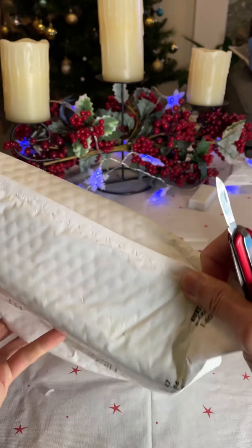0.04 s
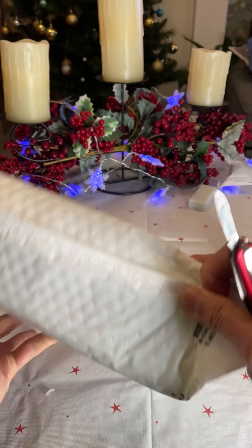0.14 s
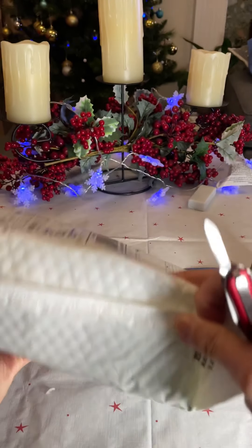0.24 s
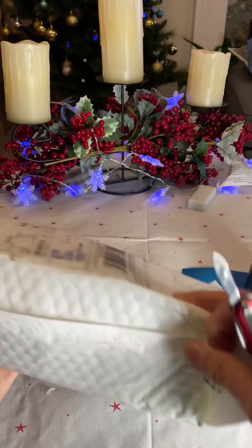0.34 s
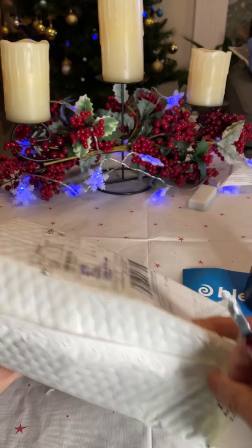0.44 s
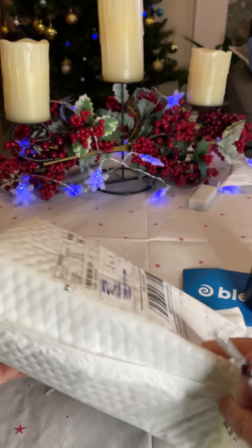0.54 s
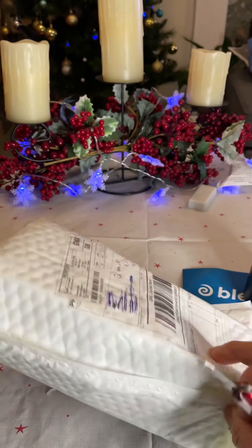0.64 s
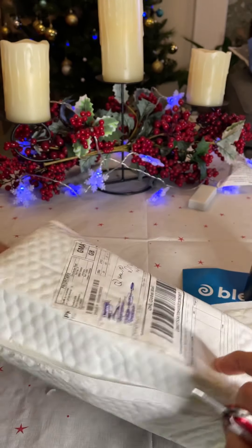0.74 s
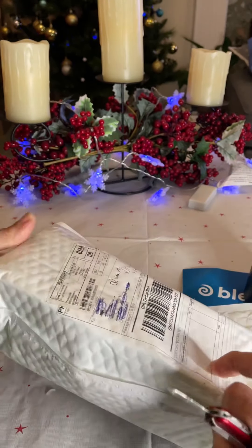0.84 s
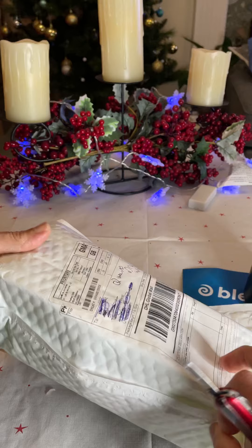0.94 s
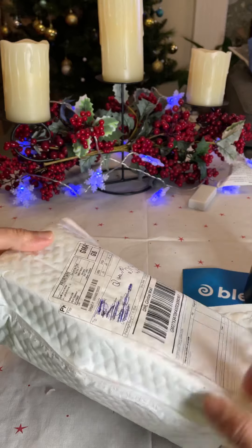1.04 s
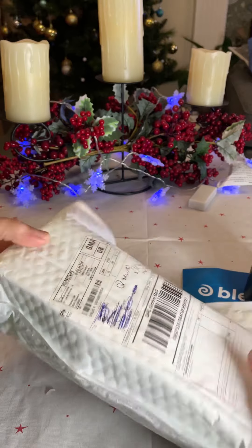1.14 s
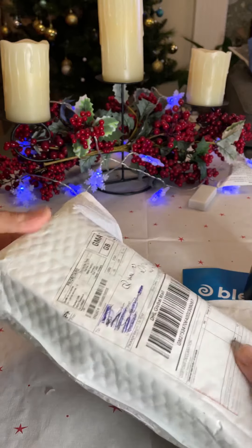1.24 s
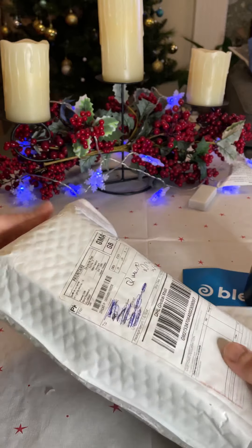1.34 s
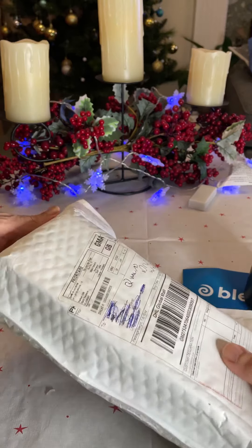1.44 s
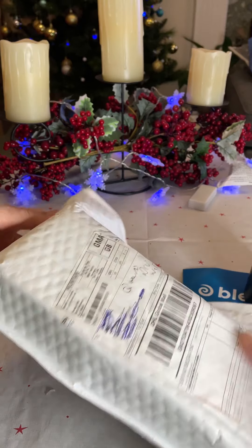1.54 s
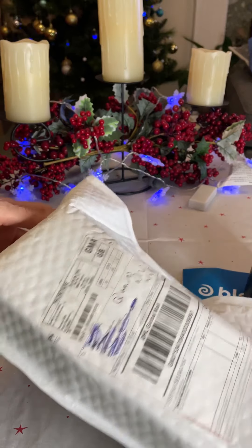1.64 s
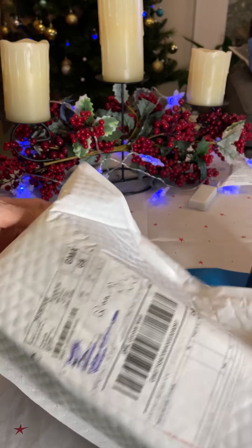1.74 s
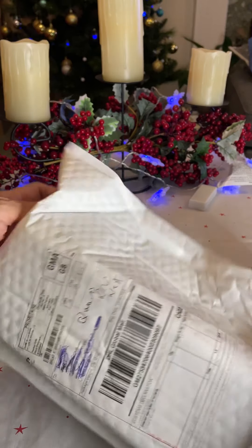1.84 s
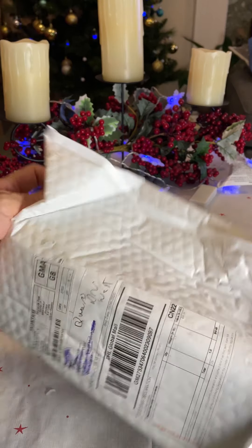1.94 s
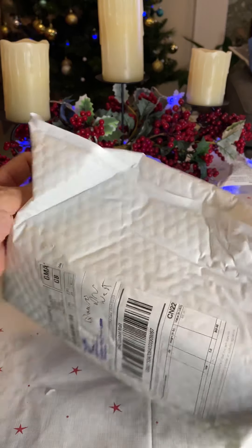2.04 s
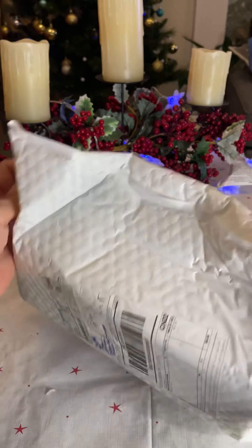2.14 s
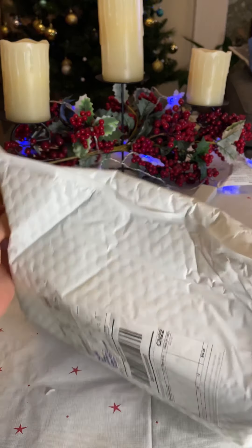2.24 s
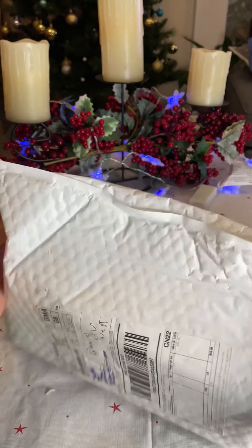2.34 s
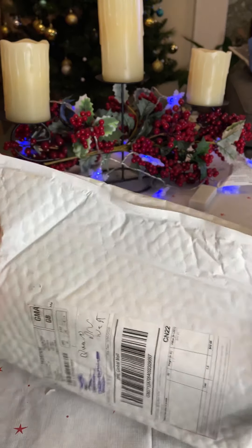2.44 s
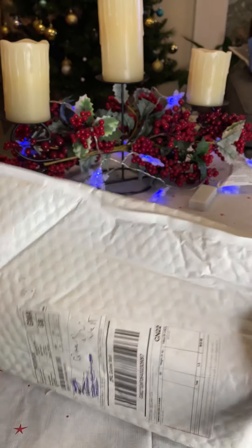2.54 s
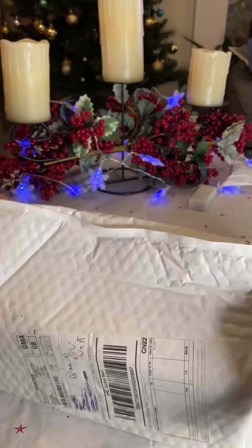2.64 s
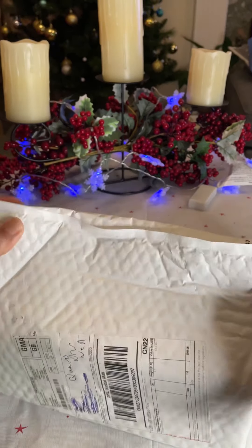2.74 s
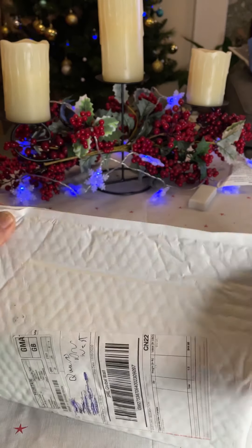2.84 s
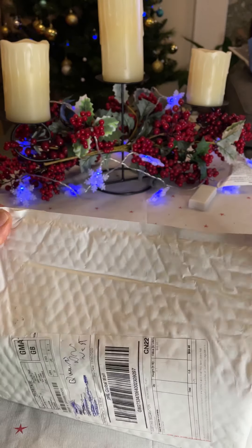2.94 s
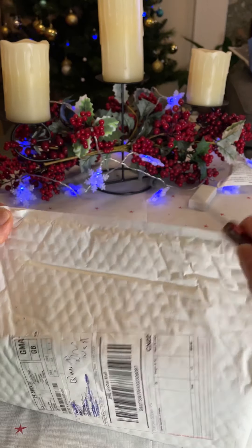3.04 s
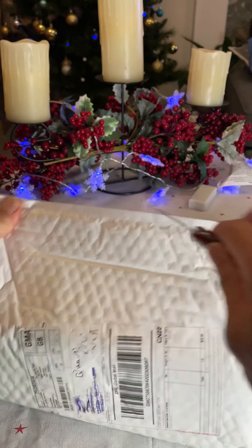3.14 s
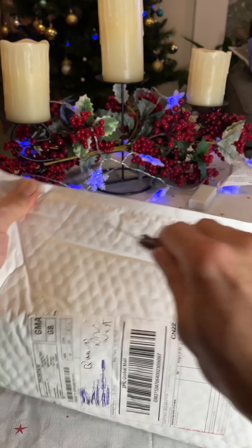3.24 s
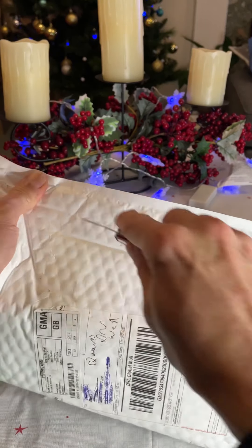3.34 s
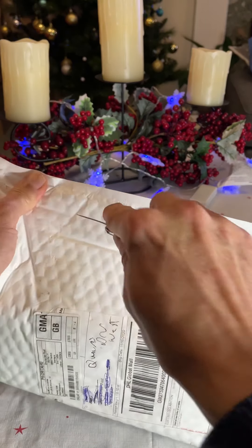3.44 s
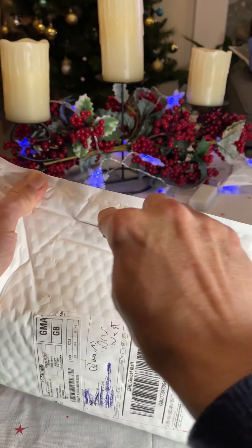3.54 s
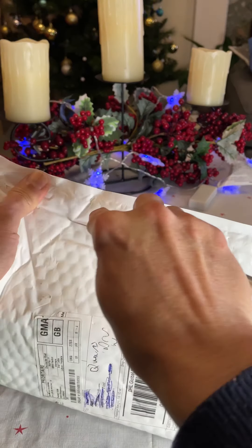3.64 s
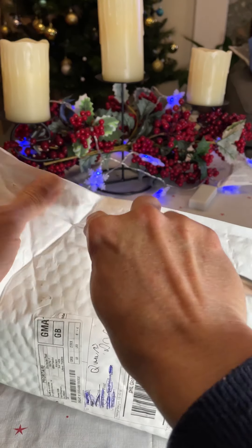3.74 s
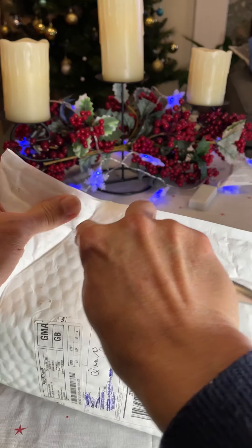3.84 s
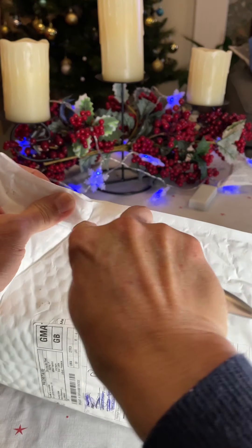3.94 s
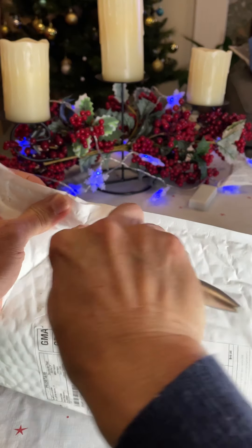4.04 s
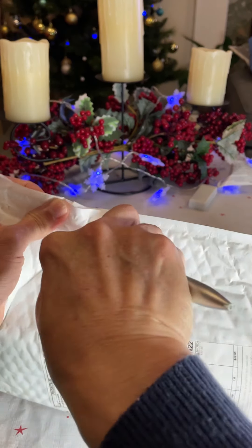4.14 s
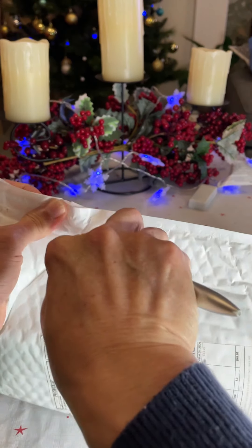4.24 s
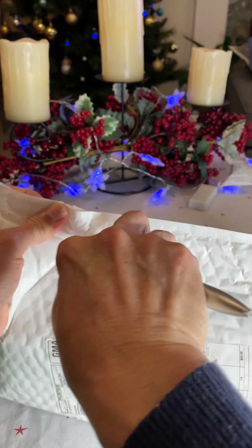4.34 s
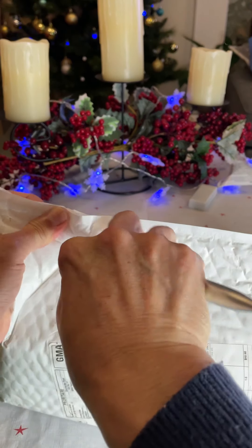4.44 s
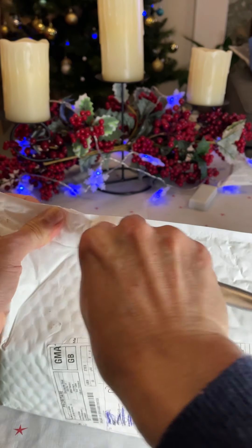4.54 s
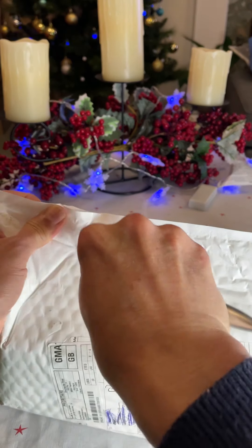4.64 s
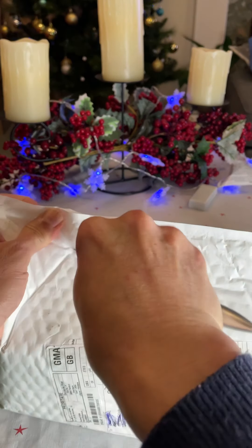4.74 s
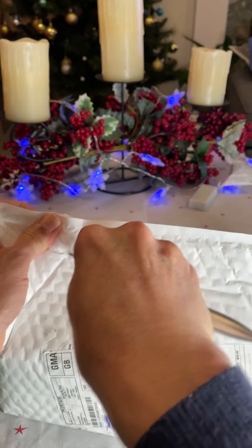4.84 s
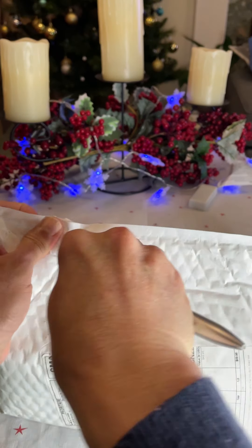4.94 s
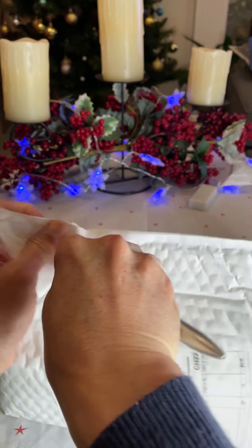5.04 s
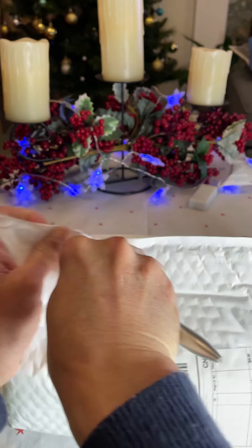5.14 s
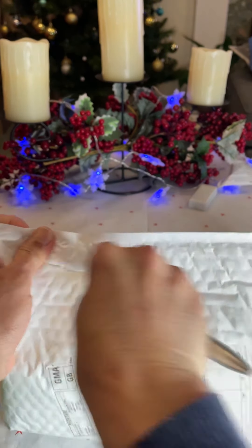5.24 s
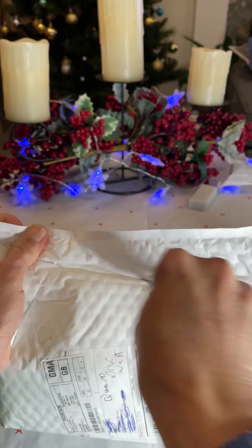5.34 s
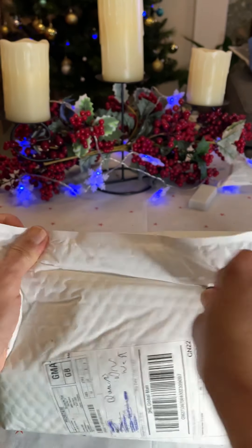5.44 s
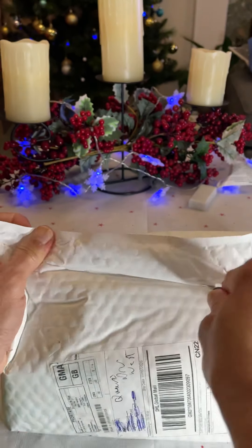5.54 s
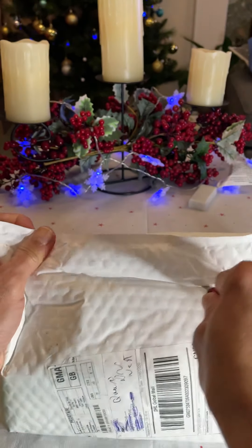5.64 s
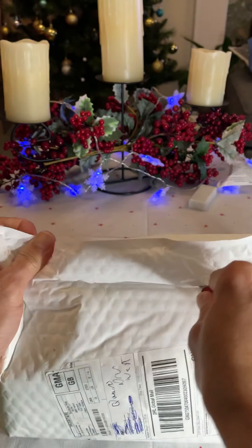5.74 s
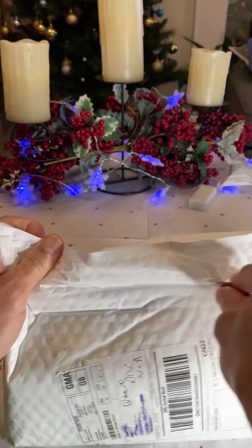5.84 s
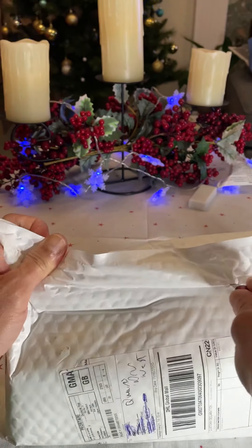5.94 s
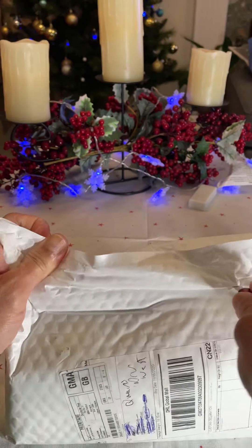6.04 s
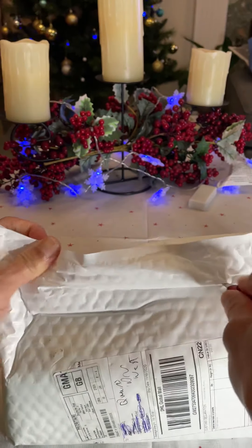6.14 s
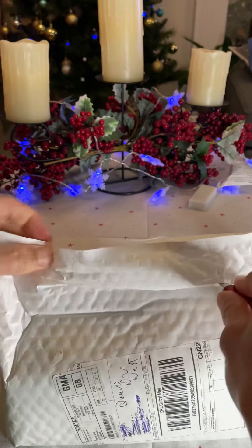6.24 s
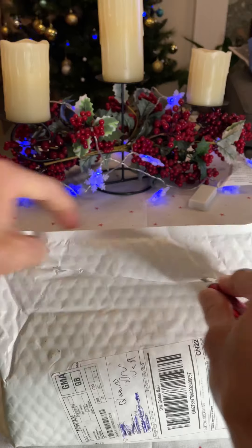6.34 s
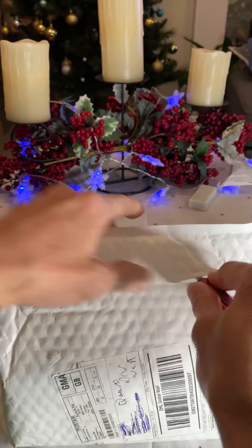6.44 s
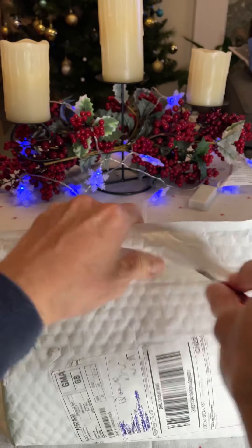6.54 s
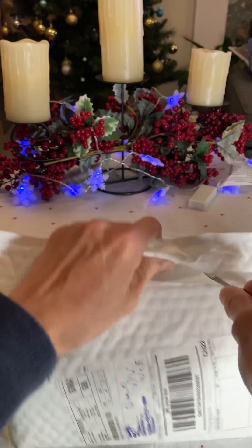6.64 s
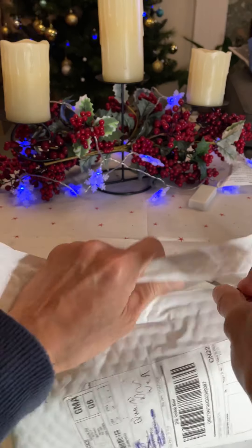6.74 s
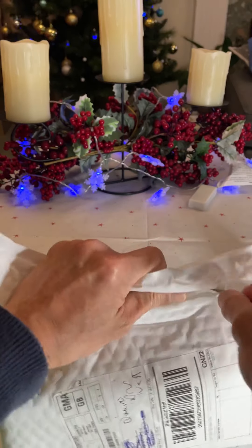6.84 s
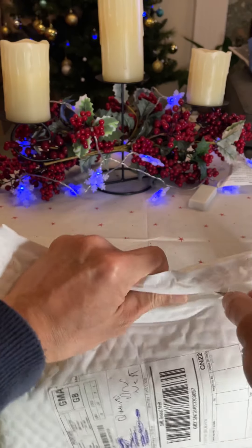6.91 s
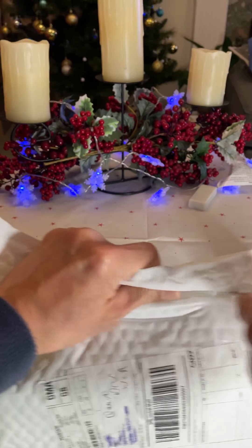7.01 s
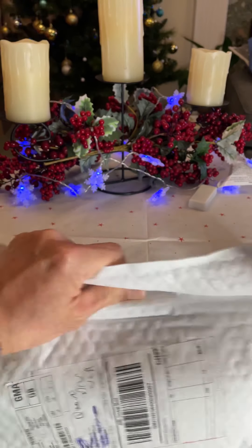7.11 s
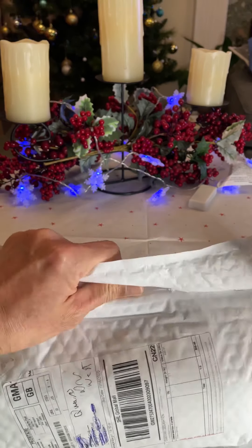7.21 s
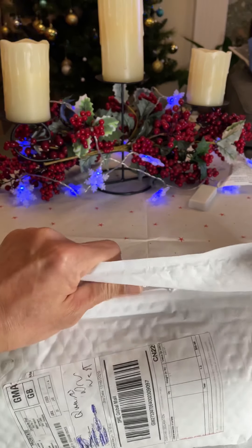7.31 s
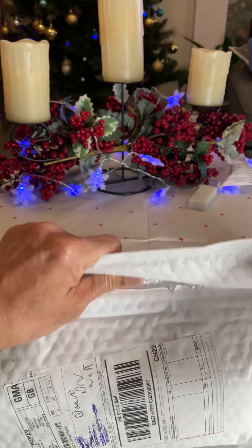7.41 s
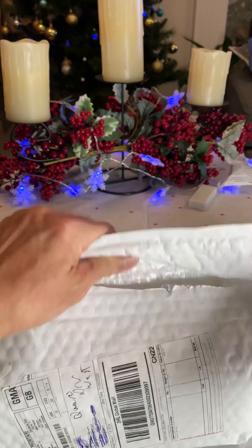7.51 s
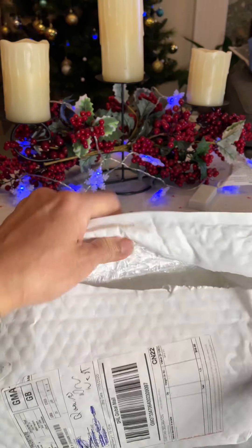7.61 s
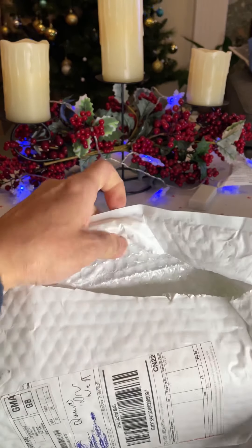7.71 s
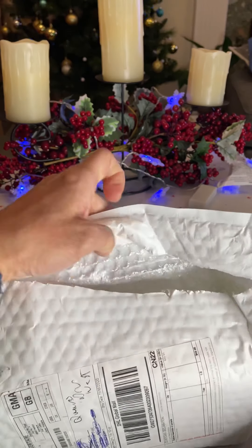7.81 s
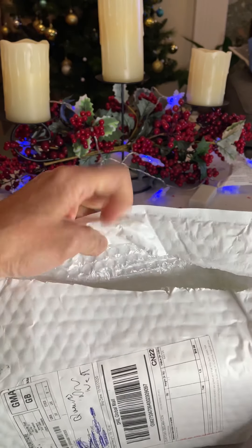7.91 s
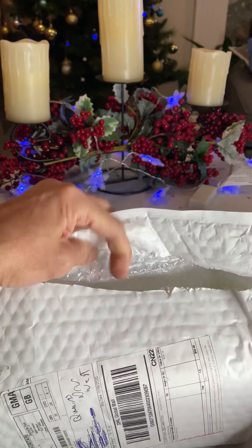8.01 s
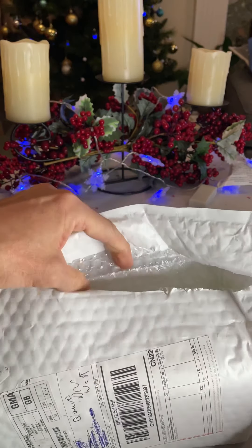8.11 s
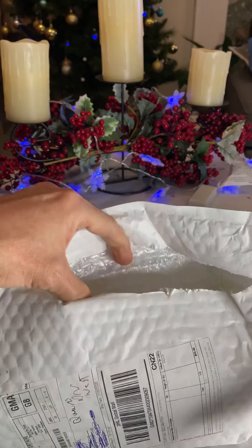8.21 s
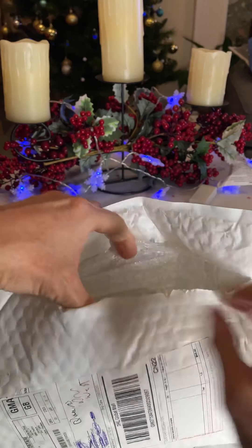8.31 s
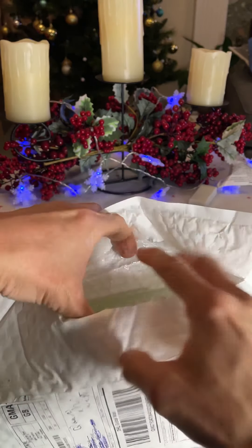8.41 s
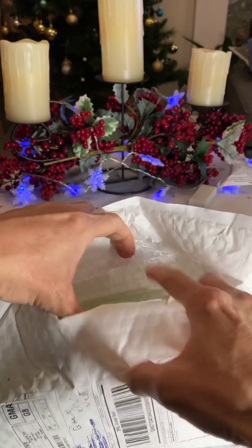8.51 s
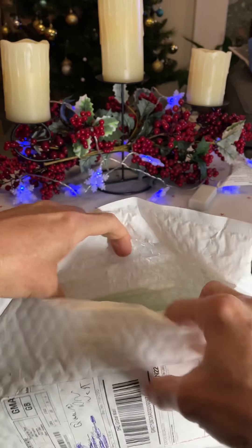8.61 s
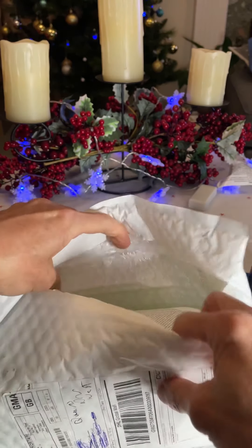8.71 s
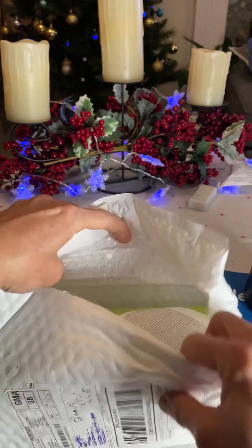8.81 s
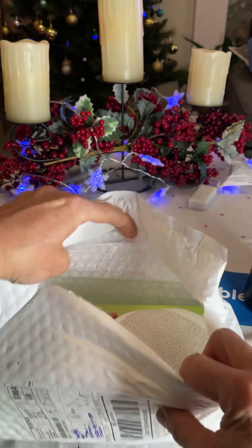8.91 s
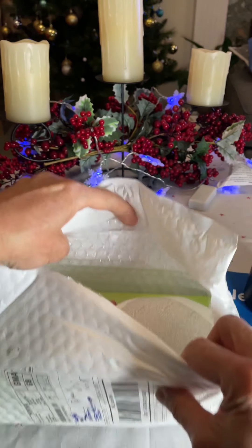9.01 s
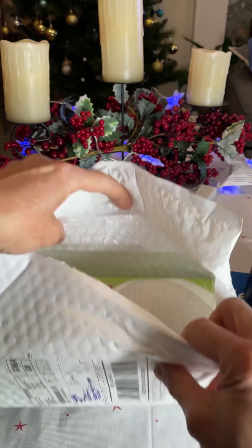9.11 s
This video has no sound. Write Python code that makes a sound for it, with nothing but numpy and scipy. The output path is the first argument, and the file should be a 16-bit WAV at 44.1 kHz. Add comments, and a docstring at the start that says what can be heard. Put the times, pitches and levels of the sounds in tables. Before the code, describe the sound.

Close stereo sound of a padded plastic bubble mailer in a small, quiet furnished room. From 0 to 0.5 s it is turned over with bright crinkles, sharp snaps and a soft cushioned bump. Lighter crackles follow until 1.5 s, then a dense flurry of ticks and film buckling to about 2 s. Irregular crinkles and pops continue to 3 s, where a low bump lands; 3.2-3.6 s is nearly still. Crisp single snaps scatter from 3.7 to 4.9 s. The seam rips in forceful, full-bodied jerks at 4.97-5.4 s, with a smaller tear at 5.8 s. Moderate rustling leads to a brighter quick rip at 6.95-7.06 s. Light crinkling follows from 7.4 s, then dull hollow cardboard knocks at 7.97-8.17 s. From 8.3 s the crackling swells, busiest around 8.6-8.9 s, easing after 9 s.

```python
"""In a small furnished room, a plastic bubble mailer is turned over, torn along its seam and pulled open, close up.
Large facets of film buckle as dispersive pulses, heard as sharp snaps and falling chirps; tears are runs of jerks.
Beneath them random grains of ringing film and a noise rub make the crinkle, riding on grip and movement levels.
The padded envelope bumps as wobbling low sines, and knocks on the cardboard box inside are thuds with ringing modes.
Scatter off the table and hands and a short dull tail make the room, over a quiet low floor of noise."""
import sys
import numpy as np
from scipy import signal
from scipy.fft import rfft, irfft, next_fast_len
from scipy.io import wavfile
from scipy.ndimage import uniform_filter1d

SR = 44100
rng = np.random.default_rng(int(sys.argv[2]) if len(sys.argv) > 2 else 0)


def int16_out(signal):
    """Quantize to a 16-bit WAV file."""
    q = np.round(np.clip(np.atleast_2d(signal).T, -1, 1) * 32767)
    wavfile.write(sys.argv[1], SR, q.astype(np.int16))


N = 404397
TIME = np.arange(N) / SR
RING = (np.arange(1400) / SR).astype(np.float32)  # time axis of one buckle, s

# tears of the seam: start/s, length/s, level at the start/dB before trim, body (weighted by band), treble/dB
TEARS = [(4.969, 0.054, -24.5, 2.5, -3), (5.182, 0.04, -24, 2.5, -5), (5.254, 0.033, -28.5, 4.5, 2),
         (5.331, 0.071, -29.5, 4, 0), (5.786, 0.021, -33, 4.5, 3), (6.952, 0.038, -25.5, 2.5, 4),
         (6.991, 0.038, -32, 2.5, -3)]
# jerks of a tear: t/s, level/dB before trim, f/Hz
TEAR_JERKS = [(4.9694, -10, 2400), (4.979, -20, 2590), (4.9916, -16.5, 2250), (5.04, -22, 2300.0),
              (5.051, -28, 1300.0), (5.1758, -8, 1130), (5.184, -19, 1700), (5.1915, -16, 1500),
              (5.1994, -17.5, 1210), (5.216, -16, 2470), (5.2262, -7.5, 1220), (5.2564, -15.5, 840),
              (5.261, -10.5, 870), (5.2897, -16.5, 920), (5.301, -20, 1290), (5.3175, -14.5, 1890),
              (5.3207, -14, 1390), (5.3351, -10, 1150), (5.347, -14.5, 1280), (5.38, -19.5, 1000),
              (5.392, -29, 910), (5.811, -12.5, 1610), (5.822, -16.5, 2870), (6.9546, -11.5, 1960),
              (6.9617, -14.5, 1190), (6.9727, -17.5, 6400.0), (6.979, -18.5, 4000), (6.9853, -14, 1880),
              (6.9917, -12, 1950), (7.0129, -10.5, 2320), (7.0215, -17.0, 2280), (7.0472, -13.5, 2600),
              (7.0587, -19.5, 2320)]


def from_db(db):
    """Turn decibels into an amplitude gain."""
    return 10 ** (np.asarray(db) / 20)


def rms_one(x):
    """Scale to rms 1."""
    return x / np.sqrt(np.mean(x ** 2) + 1e-20)


def at_hz(points, hz):
    """Read a spectrum on a log-frequency axis."""
    known_hz, values = np.transpose(points)
    return np.interp(np.log(np.maximum(hz, 1)), np.log(known_hz), values)


def shaped(x, response):
    """Filter by a gain that is a function of frequency."""
    size = next_fast_len(N + 4096)
    spectrum = rfft(x, size) * response(np.fft.rfftfreq(size, 1 / SR))
    return irfft(spectrum, size)[..., :N]


def filtered(x, order, hz, kind="low"):
    """Run a Butterworth filter."""
    return signal.sosfilt(signal.butter(order, hz, kind, fs=SR, output="sos"), x)


def below(x, hz):
    """The part of a sound under hz, without phase shift."""
    return signal.sosfiltfilt(signal.butter(2, hz, fs=SR, output="sos"), x)


def add(track, s, sound):
    """Mix a sound in at time s."""
    start = min(max(round(s * SR), 0), N)
    track[..., start:start + sound.shape[-1]] += sound[..., :N - start]


def body_share(hz):
    """The more of the padded panel moves, the deeper it radiates: a slope that rises below about 1 kHz."""
    return np.minimum(np.log1p((800 / hz) ** 3) / 1.9, 1.2)


def treble_share(hz):
    """Above about 4 kHz only the sharp crease radiates."""
    return 1 - 1 / (1 + (hz / 4200) ** 4)


def placed(sound, lag_samples=0.084, pan_db=1.0):
    """Each patch lies in its own direction and reaches one side a little sooner and louder."""
    side = rng.normal() * np.array([[1], [-1]])
    shifted = sound + np.gradient(sound) * lag_samples * side
    return shifted * from_db(pan_db * side)


def facet(colour, decay_s, travel_s, scatter_db=5.5, hump_db=0, treble_db=0,
          pitch_hz=1600, spread_octaves=0.94, count=48):
    """A patch of sheet buckles and rings in its own modes; stereo, rms 1 over 5 ms before treble and placing."""
    # one mode at a random spot in each equal slice of the log-frequency axis
    hz = 130 * (16000 / 130) ** ((np.arange(count) + rng.random(count)) / count)
    decay = decay_s * (1000 / hz) ** 0.22
    # the size of the patch favours one region of pitch
    octaves = np.log2(hz / pitch_hz) + spread_octaves * rng.normal()
    hump = hump_db * np.exp(-(octaves / .5) ** 2)
    mode_db = at_hz(colour, hz) + hump + rng.normal(0, 1, count) * scatter_db
    strength = from_db(mode_db) * np.sqrt(hz / decay) * rng.choice([-1, 1], count)
    # bending waves are dispersive: the lows arrive after the highs
    arrival = travel_s * (1000 / hz) ** 0.708
    age = np.maximum(RING - np.float32(arrival)[:, None], 0)
    fade = np.exp(-np.minimum(age / np.float32(decay)[:, None], 20))
    modes = fade * np.sin(np.float32(2 * np.pi * hz)[:, None] * age)
    level = np.sqrt(np.sum((strength @ modes) ** 2) / (.005 * SR))
    coloured = strength / level * from_db(treble_db * treble_share(hz))
    return placed(coloured @ modes)


def stroke(start, length, attack_s, release_s, change_db):
    """Gain of one movement: it rises, holds while its level changes steadily, and dies away."""
    age = TIME - start
    near = (age > -.15) & (age < length + .3)
    gain, age = np.zeros(N), age[near]
    outside = np.maximum(-age, 0) / attack_s + np.maximum(age - length, 0) / release_s
    gain[near] = from_db(change_db * np.clip(age / length, 0, 1)) * np.exp(-outside)
    return gain


def tear_colour(s):
    """Body and treble of the tear whose middle is nearest to time s."""
    _, _, _, body, treble_db = min(TEARS, key=lambda tear: abs(tear[0] + tear[1] / 2 - s))
    return body, treble_db


def movements(trail_db=-16, trail_s=0.0052):
    """Each flex, tear and jerk stirs the film: its gain over time, body and treble in dB."""
    # the mailer is bent, turned or pulled open:
    # start/s, length/s, crinkle level/dB before trim, body (weighted by band)
    flex_moves = [(0.071, 0.14, -40, 0.5), (0.425, 0.12, -45, 0.5), (0.721, 0.044, -41, 1.5),
                  (0.863, 0.15, -49.5, 0.5), (1.124, 0.088, -52, 2.5), (1.267, 0.055, -48, 1),
                  (1.583, 0.34, -42, -5.5), (1.852, 0.12, -45.5, 1), (2.24, 0.12, -43, 0),
                  (2.534, 0.048, -37.5, 1.5), (2.68, 0.1, -40, 2.5), (2.866, 0.081, -37, 2),
                  (3.012, 0.0052, -39.5, 3), (3.469, 0.078, -54, 3.5), (3.648, 0.24, -44.5, 1.5),
                  (4.495, 0.15, -49.5, 3), (4.885, 0.083, -47, 2), (5.102, 0.055, -39.5, 3.5),
                  (5.595, 0.022, -42.5, 2), (5.699, 0.16, -41, 2.5), (6.079, 0.06, -41, 2.5),
                  (6.244, 0.0081, -40.5, 2.5), (6.459, 0.31, -43, 1.5), (6.562, 0.16, -40, 1),
                  (7.423, 0.2, -45.5, 3), (7.963, 0.27, -46.5, 3.5), (8.358, 0.47, -45, 0),
                  (8.594, 0.25, -39.5, 3)]
    for start, length, level_db, body in flex_moves:
        # the film resists more the further it bends
        gain = stroke(start, length, attack_s=0.016, release_s=0.017, change_db=1.5)
        yield from_db(level_db) * gain, body, 0
    for start, length, level_db, body, treble_db in TEARS:
        # a tear starts at once and eases as the tension goes
        gain = stroke(start, length, attack_s=0.003, release_s=0.017, change_db=-2.5)
        yield from_db(level_db) * gain, body, treble_db
    for s, level_db, _ in TEAR_JERKS:
        # after each jerk the loosened film crackles on
        gain = stroke(s, 0.00072, .0005, trail_s, 0)
        body, treble_db = tear_colour(s)
        yield from_db(level_db + trail_db) * gain, body, treble_db


def handling(grip_trim_db=1, grip_body=2, base_treble_db=4.5, treble_per_db=-0.08):
    """Grip and movements add up in power, each colouring the crinkle by its share: level/dB, body, treble/dB."""
    # the hands never quite rest; faint crinkle under their grip: t/s, level/dB before trim
    grip_levels = [(0, -48.5), (.95, -51), (1.1, -56.5), (1.55, -54), (1.8, -42), (2.2, -50), (3.03, -51),
                   (3.19, -62), (3.34, -71), (3.43, -65.5), (3.85, -49), (4.1, -59), (4.85, -58),
                   (5.3, -54.5), (6.85, -49), (7.2, -56), (7.6, -42.5), (7.9, -53.5), (8.6, -41.5),
                   (9.17, -51.5)]
    power = from_db(np.interp(TIME, *np.transpose(grip_levels)) + grip_trim_db) ** 2
    body_sum, treble_sum = power * grip_body, 0
    for gain, body, treble_db in movements():
        part = gain ** 2
        power = power + part
        body_sum = body_sum + part * body
        treble_sum = treble_sum + part * treble_db
    level_db = 10 * np.log10(power)
    # gentle handling is mostly fine, bright crinkle
    touch_db = base_treble_db + treble_per_db * (level_db - level_db.mean())
    return level_db, body_sum / power, treble_sum / power + touch_db


def crinkle(per_s=440, spread_db=3.0, clump_db=1.28, sharpness_db=-3.0, trim_db=1.0,
            rub_db=-9, rub_per_db=-0.4, deep_hz=380, body_hz=850, treble_hz=4200, count=48):
    """Small facets buckle at random while film and fingers slide; harder handling makes more of them."""
    # colour of the fine crinkle: f/Hz, level/dB per Hz
    film_colour = [(50, -1), (140, -13.5), (300, 1), (600, 1), (850, 0.5), (1400, 1), (2500, 1.5),
                   (5300, -2), (7500, -7), (11000, -6.5), (13000, -12.5), (16000, -16.5)]
    level_db, body, treble_db = handling()
    effort_db = level_db - level_db.mean()
    rate = per_s * from_db(.15 * effort_db)
    sizes = from_db(spread_db * np.minimum(rng.exponential(1, N), 3.2)) * rng.choice([-1, 1], N)
    clicks = sizes * (rng.random(N) < rate / SR)
    # the work of the hands is shared among the facets that buckle together
    clicks = clicks / np.sqrt(uniform_filter1d(clicks ** 2, size=2600) + 1e-4)
    # one fold sets off its neighbours, so they come in clumps
    clumps = rms_one(uniform_filter1d(rng.standard_normal(N), size=800))
    clicks = clicks * from_db(clump_db * clumps)

    facets = [facet(film_colour, decay_s=0.0023, travel_s=0.001792, scatter_db=2.0, hump_db=11.5,
                    treble_db=sharpness_db * rng.normal()) for _ in range(count)]
    grains, dealt = np.zeros((2, N)), rng.integers(0, count, N)
    for i in np.flatnonzero(clicks).tolist():
        add(grains, i / SR, clicks[i] * facets[dealt[i]])

    # a light touch slides on the film more than it buckles it
    rub = shaped(rng.standard_normal(N), lambda hz: from_db(at_hz(film_colour, hz)))
    sliding = from_db(rub_db + rub_per_db * effort_db)
    film = (rms_one(grains) + sliding * rms_one(rub)) / np.hypot(1, sliding)

    # taut film loses its lows, the deepest first: body is weighted into dB for each band
    deep, low, dull = below(film, deep_hz), below(film, body_hz), below(film, treble_hz)
    lows = from_db(4.18 * body) * deep + from_db(0.07 * body) * (low - deep)
    highs = from_db(treble_db) * (film - dull)
    return from_db(level_db + trim_db) * (lows + dull - low + highs)


def bumps(swell_s=0.016, typical_hz=80, sag=0.16, wobble=0.48):
    """The air cushion is squeezed and wobbles unevenly, slowing as it relaxes; small pockets settle sooner."""
    # soft bumps of the padded envelope: t/s, envelope peak/dB, nominal f/Hz
    cushion_hits = [(0.05, -38.5, 106), (0.499, -48, 68.7), (1.145, -51, 69), (2.06, -46, 104.6),
                    (2.555, -38.5, 128), (2.595, -42, 57.7), (3.022, -31.5, 58.7), (3.733, -40, 66.6),
                    (3.799, -45, 51.3), (4.575, -47, 92), (4.969, -22, 106), (5.386, -28, 108),
                    (5.818, -29, 220), (6.233, -39, 89.5), (6.347, -48, 61), (6.973, -24.5, 227),
                    (7.018, -24, 331), (7.477, -38.5, 100), (8.036, -38, 105)]
    out, age = np.zeros(N), TIME[:SR // 5]
    for s, peak_db, hz in cushion_hits:
        uneven = rms_one(uniform_filter1d(rng.standard_normal(len(age)), size=250))
        relaxing = sag * (np.exp(-age / 0.012) - .5)
        turns = np.cumsum(hz * (1 + relaxing + wobble * uneven)) / SR
        squeeze = age / swell_s * np.sqrt(hz / typical_hz)
        envelope = squeeze * np.exp((1 - squeeze ** 2) / 2)
        add(out, s, from_db(peak_db) * envelope * np.sin(2 * np.pi * turns))
    return out


def snap(pitch_hz, travel_s, body, treble_db=0, echo_db=-3.0, echo_s=0.0011, focus=1.35, count=6):
    """A facet flips: a pulse focused on its pitch crosses the film and returns off creases, lows slowest: a chirp."""
    # colour of one snap: f/Hz, level/dB per Hz
    pulse_colour = [(120, -8), (350, 10), (850, -1), (1400, 3.5), (3000, -1), (5300, -1.5), (7500, -4),
                    (11000, -3), (13000, -10.5), (16000, 0.5)]
    hz = np.maximum(np.fft.rfftfreq(2048, 1 / SR), 1)
    resonance = 1 + 1j * focus * (hz / pitch_hz - pitch_hz / hz)
    pulse = from_db(at_hz(pulse_colour, hz)) / resonance
    returns = echo_s * (0.38 + rng.exponential(1, count))
    strengths = from_db(echo_db) / np.sqrt(count) * rng.choice([-1, 1], count)
    creases = strengths @ np.exp(-2j * np.pi * np.outer(returns, hz))
    # summing the arrival time over frequency gives the phase of a dispersed pulse
    arrival = travel_s * 1000 / np.maximum(hz, 200)
    wave = pulse * (1 + creases) * np.exp(-2j * np.pi * np.cumsum(arrival) * hz[1])
    # rms 1 over 5 ms before body, treble and placing
    level = np.sqrt(np.sum(irfft(wave) ** 2) / (.005 * SR))
    tone = from_db(body * body_share(hz) + treble_db * treble_share(hz))
    return placed(irfft(wave / level * tone)[:len(RING)])


def snaps(trim_db=-2.0, jerk_trim_db=-5.0):
    """Large facets give way one by one, and the seam rips in jerks that cross the whole panel."""
    # loud single buckles of the film: t/s, level/dB before trim, f/Hz, treble/dB
    buckles = [(0.0591, -16.5, 7800, -18.5), (0.1196, -17, 11000.0, -7), (0.165, -23.5, 4000.0, -3.5),
               (0.3996, -25.5, 2200.0, -2), (0.414, -36, 1800.0, 4.0), (0.4245, -37, 1820, 10),
               (0.7496, -30.5, 3800.0, 1), (0.9319, -36, 1730, 3), (0.9868, -33, 1840, 12.5),
               (1.1744, -36.5, 1400.0, 12.5), (1.2245, -41.5, 1100, 2), (1.2696, -39, 1500.0, 9),
               (1.2897, -36, 810, 4), (1.4308, -37, 2200.0, 4), (1.5855, -36, 1900.0, 12),
               (1.5897, -33, 1810, 8), (1.6, -35, 1120, 3), (1.659, -37, 4030, 7), (1.681, -34, 1600, 13),
               (1.6928, -32, 1210, 17), (1.7114, -32.5, 1780, 13), (1.737, -39, 1100, 0),
               (1.7618, -33, 1270, 17), (1.766, -32, 810, 5), (1.781, -18, 9900, -10),
               (1.8115, -38, 2300.0, 10), (1.8501, -35.5, 1880, 17), (1.857, -33.5, 900, 13),
               (1.8818, -37, 1900.0, 16), (1.9122, -20.5, 9600.0, -5.5), (1.9349, -26, 1450, 10),
               (2.059, -27.5, 2600, -2), (2.0787, -30, 1500.0, 2), (2.1518, -35, 834, 7),
               (2.2761, -30, 1340, 16), (2.332, -53, 1590, 16), (2.3834, -25.5, 2000.0, 0.5),
               (2.495, -34.5, 1290, 7), (2.7075, -25, 1740, 5), (2.7239, -26.5, 2050, 6),
               (2.8326, -31.5, 810, 6), (2.904, -33.5, 900, 21), (2.9347, -30.5, 2200.0, 8),
               (2.943, -32.5, 2200, 2), (3.012, -33.5, 554, 11), (3.0605, -30.5, 1550, -3),
               (3.15, -43, 2700.0, 6.5), (3.391, -53.5, 1120, 18), (3.4406, -37.5, 7900.0, -5.5),
               (3.6203, -37.5, 990, 12), (3.6866, -30, 1790, 7), (3.7268, -18, 6900.0, -17),
               (3.7553, -33.5, 1030, 3), (3.806, -32.5, 1990, 7.5), (3.8354, -11.5, 10800, -14),
               (3.8542, -35, 2220, 15), (3.9215, -32.5, 1890, -1), (3.9515, -27, 2200, -23),
               (3.978, -28, 11000.0, -10.5), (3.9911, -33.5, 2330, -7), (4.113, -22.5, 9500, -18.5),
               (4.2373, -32.5, 3000, 9), (4.374, -38.5, 1300, 0), (4.421, -38.5, 1840, -9),
               (4.5303, -36, 1590, 12), (4.547, -35, 1300.0, 16), (4.5754, -27.5, 1220, -1),
               (4.6176, -24, 5300.0, -11.5), (4.7229, -40.5, 1900.0, 16), (4.7462, -35.5, 1480, 12),
               (4.7797, -32.5, 1650, 8), (4.806, -31, 1600.0, 8), (4.8514, -35.5, 1950, 13.5),
               (4.8899, -31.5, 830, 4), (4.9137, -16.5, 7850, -14.5), (5.123, -24.5, 1200.0, 6.0),
               (5.1473, -24.5, 2500.0, -2), (5.5204, -34.5, 2190, 4), (5.7132, -32.5, 1280, -2),
               (5.7529, -25.5, 2900.0, 2), (5.7706, -17, 7900.0, -6), (5.962, -34, 1990, 10),
               (6.1309, -33.5, 1910, 2), (6.2545, -26.5, 2550, 10), (6.6203, -25.5, 2900.0, -1),
               (6.728, -31, 1330, 17), (6.822, -35.5, 900, -1), (6.882, -25.5, 6300, -9),
               (7.454, -32, 2070, 6.5), (7.4894, -32, 1490, 12.5), (7.5, -31, 825, 3),
               (7.5631, -29, 1040, 8), (7.7312, -37.5, 1920, 12), (7.9687, -29.5, 800.0, 7),
               (7.99, -26, 1380, 12.5), (8.184, -35, 1100, 3), (8.29, -36, 1510, 11),
               (8.3764, -28.5, 1300.0, -4), (8.4143, -31.5, 2400, 3.5), (8.4564, -32.5, 1600.0, 0),
               (8.482, -31.5, 1500, 11), (8.495, -31.5, 1390, 15), (8.598, -17.5, 7900.0, -7.5),
               (8.6358, -29, 1240, 11), (8.747, -21.5, 1250, 8.5), (8.7954, -29.5, 1390, 17),
               (8.8148, -25, 1900.0, 2), (8.89, -22, 9800, -8.5), (9.0313, -37.5, 1700.0, 7),
               (9.0543, -25.5, 2340, 4.5), (9.1451, -37, 1720, 15.5)]
    out = np.zeros((2, N))
    for s, level_db, pitch_hz, treble_db in buckles:
        sound = snap(pitch_hz, travel_s=0.001214, body=2.5, treble_db=treble_db)
        add(out, s, from_db(level_db + trim_db) * sound)
    for s, level_db, pitch_hz in TEAR_JERKS:
        sound = snap(pitch_hz, travel_s=0.001966, body=7.5, treble_db=5.0, echo_db=-5.5, echo_s=0.002)
        add(out, s, from_db(level_db + jerk_trim_db) * sound)
    return out


def box(ring_db=-1.0, thud_db=1.0):
    """Each knock is a dull thud that leaves the hollow cardboard ringing."""
    # knocks on the box inside: t/s, level/dB before the thud and ring trims
    box_hits = [(7.97, -28.5), (8.093, -23.5), (8.156, -37.5), (8.171, -36.5)]
    # modes of the box: f/Hz, level/dB before trim and scatter, t60/s
    box_modes = [(420, -12, 0.15), (490, 0, 0.1), (807, -10, 0.15), (1580, -3, 0.056)]
    # dull thud of cardboard: f/Hz, level/dB per Hz
    cardboard_colour = [(250, -10), (480, 4.5), (950, -6), (1600, -7), (2400, -28)]
    out, age = np.zeros((2, N)), TIME[:SR // 4]
    for s, knock_db in box_hits:
        thud = facet(cardboard_colour, decay_s=0.0055, travel_s=0.00186)
        add(out, s - .001, from_db(knock_db + thud_db) * thud)
        for hz, mode_db, t60 in box_modes:
            fading_db = ring_db + knock_db + mode_db + rng.normal() - 60 * age / t60
            add(out, s, from_db(fading_db) * np.sin(2 * np.pi * hz * age) * rng.choice([-1, 1]))
    return out


def room(x, dull_hz=5000, table_db=-11.0, table_s=0.01, tail_db=-15, t60_s=0.17):
    """Quick scatter off the table and hands, then a short, duller tail; unrelated on the two sides."""
    def unit_energy(h):
        """Scale each side to energy 1."""
        return h / np.sqrt(np.sum(h ** 2, axis=1, keepdims=True))

    age = TIME[:SR // 2]
    scatter = unit_energy(rng.standard_normal((2, len(age))) * np.exp(-age / table_s) * (age > .0004))
    tail = rng.standard_normal((2, len(age))) * from_db(-60 * age / t60_s) * (age > .006)
    tail = filtered(unit_energy(tail), 1, dull_hz)
    echoes = from_db(table_db) * scatter + from_db(tail_db) * tail
    return signal.oaconvolve(x, filtered(echoes, 2, 170, "high"), axes=1)[:, :N]


def scene(lowest_hz=50, floor_db=-85):
    """The mailer reaches two microphone ports a little out of phase, over the quiet of the room."""
    # phase between the two microphone ports: f/Hz, left lead/rad
    port_lead = [(200, 0), (1000, -.2), (2700, .35), (4000, .6), (5200, .3), (7000, 2.6), (8200, 3.4),
                 (10300, 6.1), (12000, 6.8), (14000, 9.4)]
    # snaps and crinkle of the film carry no deep bass
    film = filtered(snaps() + crinkle(), 2, lowest_hz, "high")
    mailer = film + bumps() + box()
    # each port takes half of the phase, in opposite directions
    ports = shaped(mailer, lambda hz: np.exp(.5j * np.outer([1, -1], at_hz(port_lead, hz))))
    quiet = rms_one(filtered(rng.standard_normal((2, N)), 1, [40, 200], "band"))
    return ports + room(mailer) + from_db(floor_db) * quiet


def record(dry):
    """The microphone sheds the deepest bass, the highest peaks are rounded, the top is cut."""
    lean = filtered(dry, 4, 36, "high")
    rounded = .9 * np.tanh(lean / .9)
    # steep cut, 90 dB down from 16.8 kHz
    return signal.sosfilt(signal.cheby2(16, 90, 16800, fs=SR, output="sos"), rounded)


dry = scene()
out = record(dry)
int16_out(out)
```